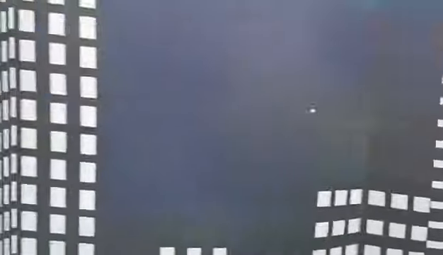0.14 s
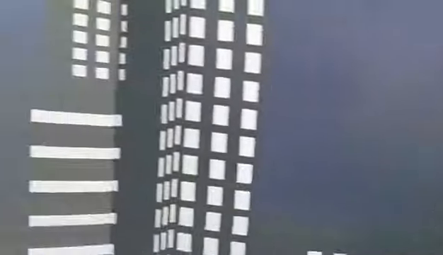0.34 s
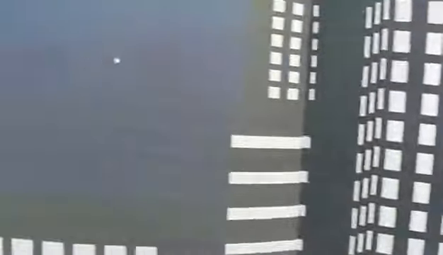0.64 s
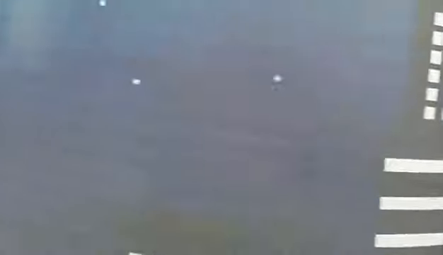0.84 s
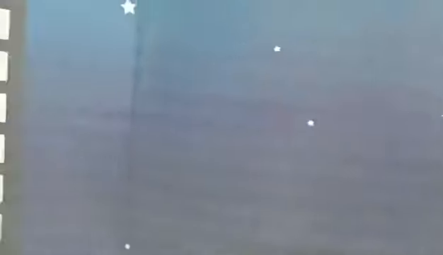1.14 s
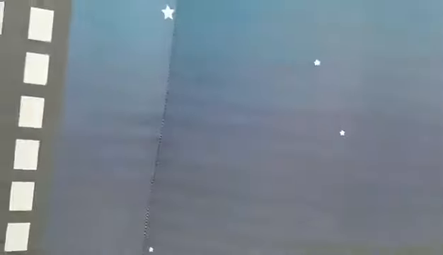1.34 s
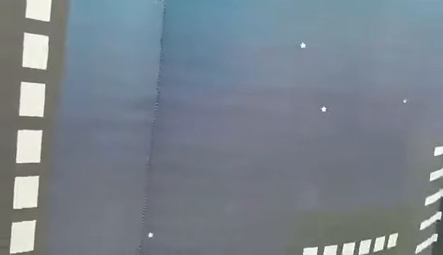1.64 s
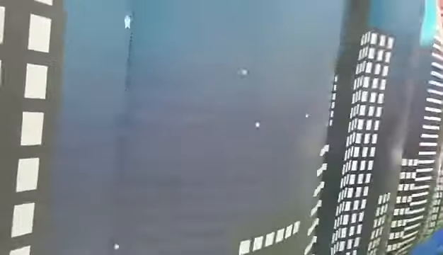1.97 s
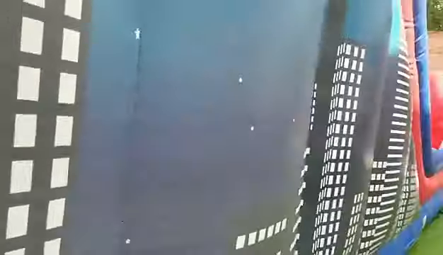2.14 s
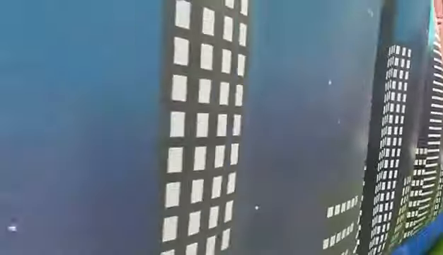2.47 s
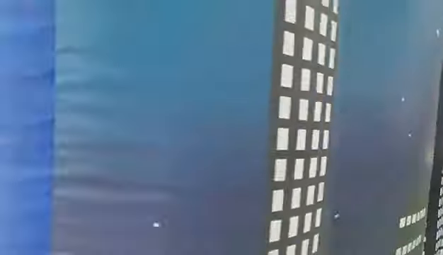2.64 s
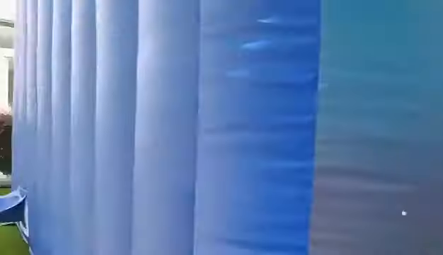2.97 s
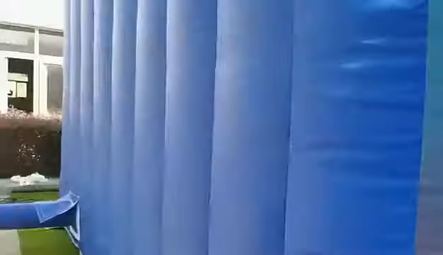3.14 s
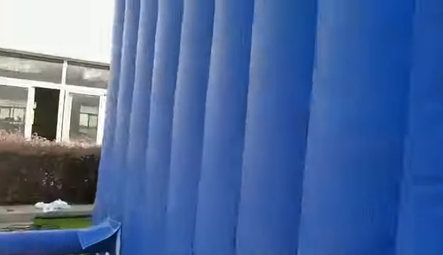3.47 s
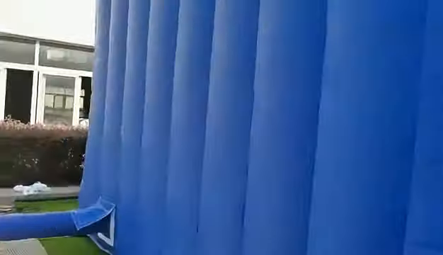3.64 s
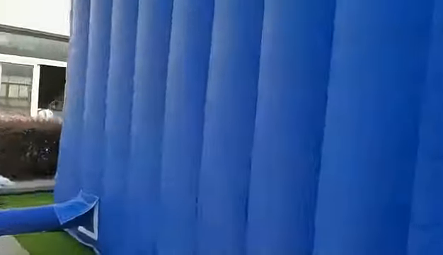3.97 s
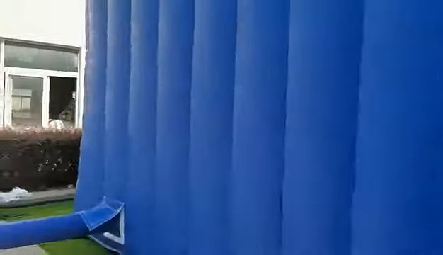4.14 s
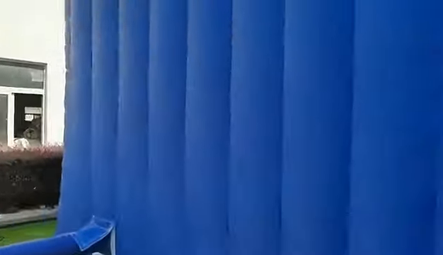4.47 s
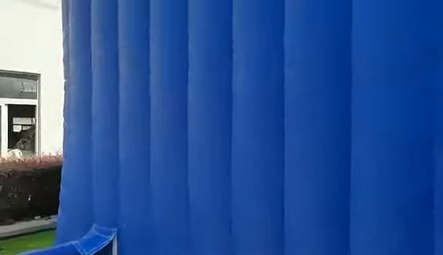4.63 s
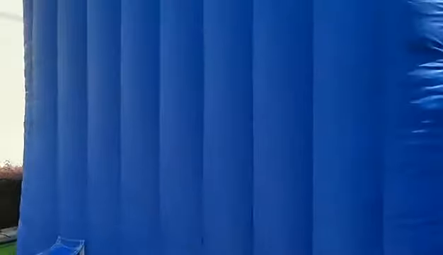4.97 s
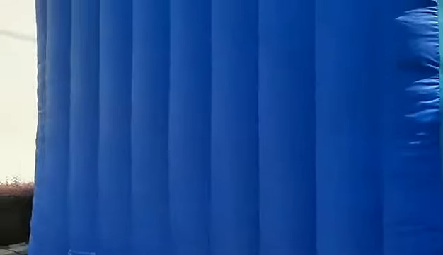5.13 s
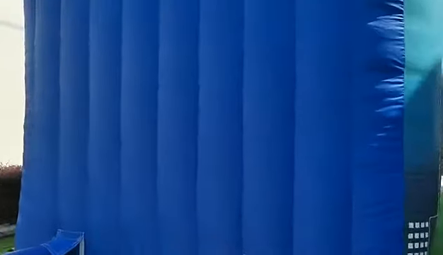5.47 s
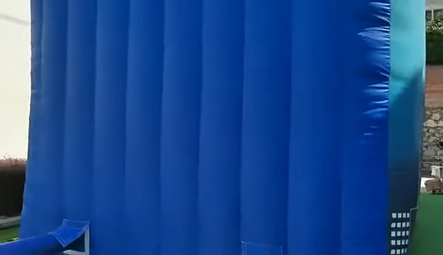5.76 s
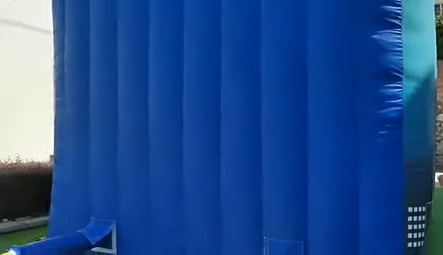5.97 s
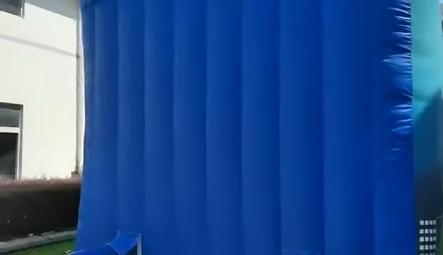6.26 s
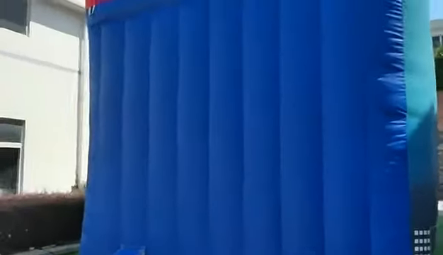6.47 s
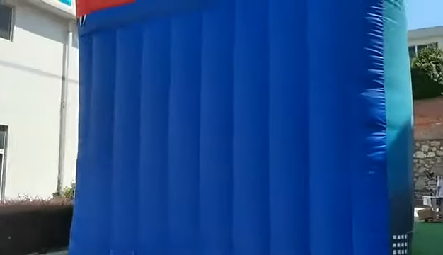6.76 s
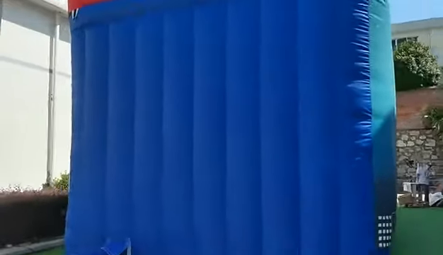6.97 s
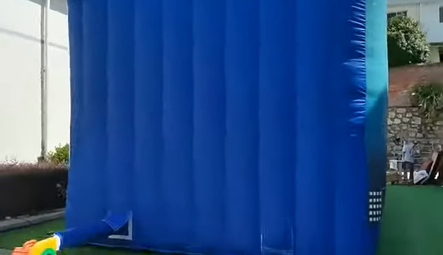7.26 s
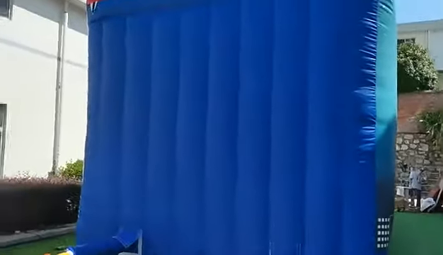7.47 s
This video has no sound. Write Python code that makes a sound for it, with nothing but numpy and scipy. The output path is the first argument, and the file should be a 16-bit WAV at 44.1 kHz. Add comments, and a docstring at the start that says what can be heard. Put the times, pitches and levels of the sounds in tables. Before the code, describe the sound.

Outdoors, a fan blower is first heard muffled behind the wall of a big inflatable. Within about three seconds the moving microphone comes into its path, and the sound grows louder and brighter, a steady airy rush with hiss on top. A faint wavering motor hum and a low rumble from the air-filled skin lie beneath. The noise continues to the end with a slightly swirling tone.

```python
"""An electric blower feeds a large inflatable outdoors: housing roar, intake rush, blade hiss, motor hum.
Two spaced microphones are carried round a corner. Behind the wall the sound is duller; in sight of the
blower the rush and hiss come up. Direct sound reaches the right microphone late; ground and wall echoes
comb it. Underneath, the skin booms, low air buffets and the feed tube adds a low-mid noise."""
import sys
import numpy as np
from scipy import signal
from scipy.fft import rfft, irfft
from scipy.io import wavfile
from scipy.ndimage import map_coordinates

SR = 44100
rng = np.random.default_rng(int(sys.argv[2]) if len(sys.argv) > 2 else 0)


def master(y):
    """Save y as 16-bit WAV."""
    cut = np.clip(np.atleast_2d(y).T, -1, 1)
    pcm = np.round(cut * 32767)  # scale
    wavfile.write(sys.argv[1], SR, pcm.astype(np.int16))


N = 335160
TIME_S = np.arange(N) / SR
HZ = np.fft.rfftfreq(N, 1 / SR) + 1e-3

# Fan noise bands. Each holds the walk settings listed at along_walk.
HOUSING_ROAR = (-31.5, 4.5, 1.24, 0.02, 1.06, -2.1, 1, 5.5, -21.5, -6.5, -1)
INTAKE_THROAT = (-28.5, 9.5, 1.84, 0.58, 1.05, 2, 2.5, 3.5, -17, -10.5, 0.5)
CASING_RUSH = (-35.5, 13.5, 2.06, 0.48, 1, 1.5, 6.5, -4, 11, 7.5, -9.5)
GRILLE_TURBULENCE = (-34, 11.5, 1.95, 0.2, 1.1943, 2, 5, 5.5, -15.5, -7.5, -5)
BLADE_HISS = (-33.5, 15.5, 1.56, 0.11, 0.05, 0.7, -0.2, 2, -8.5, -6.5, -1)
# Their swells and dips. Each row: peak in seconds, width in seconds, rise in dB, leftward push in dB.
HOUSING_SWELLS = [(1.8, 0.34, 1.4, 0.73), (2.8, 0.22, -0.19, 1.5), (4.9, 0.43, 1.5, 0),
                  (6.8, .25, 0.83, 0.32)]
THROAT_SWELLS = [(1.5, 0.2, -0.5, 0.5), (5.5, .4, 0.5, -0.5)]
CASING_SWELLS = [(2.0, 0.2, 6.5, -3.5), (4, .15, 0.5, 4.5), (7, .3, 2.5, 1.5)]
TURBULENCE_SWELLS = [(1.45, .2, 2.5, 4), (1.7, 0.16, 1, -4), (2.9, 0.317, -1.5, 1), (5.4, .3, -1.5, 1.5),
                     (6.9, 0.28, 1, -1.5)]
BLADE_SWELLS = [(2.15, 0.27, 2.5, 0), (2.86, 0.087, 2, -3.5), (3.6, 0.24, 2, -2.5), (4.65, 0.16, 2, 0),
                (5.6, 0.32, 2, 3.5), (6.3, 0.28, 2.5, -1.5), (7.1, 0.2, 1.5, -3)]

def blower():
    """Fan noise, direct in sight and scattered otherwise, echoed and split into five bands."""
    late_ms, direct, *ground_ms, _ = in_time(WALK_PATHS)
    source = rng.standard_normal(N)
    arrivals = np.array([source, delayed(source, late_ms)])
    pair = irfft(pair_spectrum(scatter(arrivals, direct)), N)
    spectrum = rfft(echoes(pair, ground_ms)) * minimum_phase(colours_db())
    roar = band(spectrum, HOUSING_ROAR, HOUSING_SWELLS, 806, 1737, eddy_depth=2.5, eddy_hz=10.8, slices=8)
    intake = band(spectrum, INTAKE_THROAT, THROAT_SWELLS, 1760, 2540,
                  eddy_depth=1.28, eddy_hz=6.8, slices=4)
    rush = band(spectrum, CASING_RUSH, CASING_SWELLS, 2610, 3575, eddy_depth=2.1, eddy_hz=16, slices=8)
    grille = band(spectrum, GRILLE_TURBULENCE, TURBULENCE_SWELLS, 3716, 5463,
                  eddy_depth=2.5, eddy_hz=27, slices=9)
    hiss = band(spectrum, BLADE_HISS, BLADE_SWELLS, 5484, 7710, eddy_depth=2.5, eddy_hz=23, slices=11)
    return roar + intake + rush + grille + hiss


# Mains hum and blade tones. Each row: pitch in Hz, level re housing roar in dB, waver in dB, blur in Hz.
MOTOR_TONES = [(300, -10, 5, 7), (400, -20, 4, 2), (1065, -18, 5, 3), (2115, -17, 4, 12)]

def motor():
    """Tones blur in pitch and waver as the microphones cross standing patterns."""
    roar_db = along_walk(HOUSING_ROAR)[0]
    late_s = in_time(WALK_PATHS)[0] / 1000
    heard_s = np.array([TIME_S, TIME_S - late_s])
    out = 0
    for hz, level_db, waver_db, blur_hz in MOTOR_TONES:
        cycles = hz * heard_s + np.cumsum(blur_hz * drift(7.76)[0]) / SR
        rms = from_db(roar_db + level_db + waver_db * drift(0.57))
        out += np.sqrt(2) * rms * np.sin(2 * np.pi * cycles)
    return out


# Low bands. Each holds the walk settings listed at along_walk.
AIR_RUMBLE = (-35, 2.5, 0.5, 0.5, 0.52, -1.2, 1.5, 5.5, 0.5, -1, -2)
SKIN_BOOM = (-29.5, 4, 2.5, 0.8, 1.17, 1.1, 3.5, -0.5, 4, 2.5, 2)
FEED_TUBE = (-38.5, 9, 2.5, 0.33, 0.27, -0.3, 2, -7, 24, 1.5, 1.5)
# Their swells. Each row: peak in seconds, width in seconds, rise in dB, leftward push in dB.
AIR_GUSTS = [(2.46, 0.28, 4, 8.5), (3.42, 0.36, 5.5, 3), (1.164, 0.21, 2, -0.5), (5.7, 0.23, 2, 1.5),
             (7.34, .3, 2.5, -0.5)]
SKIN_SWELLS = [(2.5, 0.224, 1, 0.5), (2.86, 0.087, 2.5, 0), (3.95, 0.19, 5, 0), (6.9, 0.133, 4, 1.5)]
FEED_SWELLS = [(2.1, 0.24, 4.4, -6), (7, 0.18, 1.6, 1)]

def inflatable():
    """Long waves of skin and air reach both microphones together; the tube is scattered until faced."""
    tube_noise = scatter(rng.standard_normal(N), direct=in_time(WALK_PATHS)[4])
    colour = from_db(colours_db())
    low_spectrum = pair_spectrum(rng.standard_normal(N)) * colour
    tube_spectrum = pair_spectrum(tube_noise) * colour
    rumble = band(low_spectrum, AIR_RUMBLE, AIR_GUSTS, 18, 152.2, eddy_depth=2.5, eddy_hz=3, slices=7)
    boom = band(low_spectrum, SKIN_BOOM, SKIN_SWELLS, 154.6, 385.4,
                eddy_depth=2.5, eddy_hz=3.4, slices=12)
    tube = band(tube_spectrum, FEED_TUBE, FEED_SWELLS, 377, 811, eddy_depth=4, eddy_hz=3, slices=11)
    return rumble + boom + tube


def band(spectrum, settings, swells, low_hz, high_hz, eddy_depth, eddy_hz, slices):
    """One noise band in narrow slices; each swells as eddies pass, partly alike on both sides."""
    edges_hz = np.geomspace(low_hz, high_hz, slices + 1)
    out = 0
    for low, high in zip(edges_hz, edges_hz[1:]):
        power = np.clip(1 / (1 + (low / HZ) ** 80) - 1 / (1 + (high / HZ) ** 80), 0, 1)
        eddies = drift(eddy_hz)
        gain = from_db(eddy_depth * (eddies[0] + 0.61 * eddies[::-1]))
        out += irfft(spectrum * np.sqrt(power), N) * gain
    swell_db = sum(np.outer([rise_db, left_db], bump(peak_s, width_s))
                   for peak_s, width_s, rise_db, left_db in swells)
    level_db, pan_db = along_walk(settings) + swell_db
    return rms_one(out) * from_db([level_db + pan_db / 2, level_db - pan_db / 2])


# Sound paths on the walk. Each row: time in seconds, right microphone lag in ms, blower direct share,
# left and right ground echo delays in ms, tube direct share.
WALK_PATHS = [(0, 0.12, .7, 2.0, 2.0, .7), (.9, 0.107, 0.55, 1.9, 1.9, 0.8), (1.2, 0.37, 0, 1.9, 1.2, .5),
              (1.5, 0.42, 0.7, 1.5, .5, .35), (2, 0.49, 1, 1.4, 0.49, .35),
              (2.6, 0.39, 0.91, 1.5, 0.65, .4), (3.2, 0.36, 0.96, 1.55, .95, 0.5),
              (4, 0.331, 0.98, 1.59, 0.92, .55), (4.6, 0.32, .97, 1.7, 1.1, 0.7),
              (5, 0.3, 0.98, 1.75, 1.38, 0.8), (5.7, 0.31, 0.99, 1.75, 1.42, .9),
              (6.2, 0.24, 0.99, 1.69, 1.46, 0.94), (7.6, 0.24, 0.94, 1.6, 1.4, .95)]
# Nearness to the blower. Each row: time in seconds, level in dB before a band's nearness factor.
WALK_NEARNESS = [(0, 0.5), (.5, 0), (1, -1), (1.6, -2.5), (2.2, -1), (2.8, 1), (3.4, 0), (4, 0), (4.6, 0),
                 (5.2, -1.5), (5.8, -2), (6.4, -2.5), (7, -3.5), (7.6, -5.5)]

# Walk settings of a band: level in sight in dB, wall loss in dB, corner time and ramp in seconds,
# nearness factor, intake axis gain in dB, swing gain in dB, pan (left minus right) in dB,
# pan change in dB per ms of lag, in dB behind the wall and in dB after the swing.
def along_walk(settings):
    """Level and pan in dB from wall shadow, nearness, intake axis and bearing."""
    (sight_db, wall_db, corner_s, ramp_s, nearness_factor, axis_db, swing_db,
     pan_db, pan_db_per_ms, wall_pan_db, swing_pan_db) = settings
    left_hidden = 1 - step(corner_s - 0.062, ramp_s)  # left clears the corner first
    right_hidden = 1 - step(corner_s, ramp_s)
    hidden = (left_hidden + right_hidden) / 2
    on_axis = bump(at_s=5.07, width_s=0.47)
    swung = step(at_s=7.36, width_s=0.055)  # the microphones swing round
    level_db = (sight_db - wall_db * hidden + nearness_factor * in_time(WALK_NEARNESS)[0]
                + axis_db * on_axis + swing_db * swung)
    balance_db = (pan_db + pan_db_per_ms * in_time(WALK_PATHS)[0] + wall_pan_db * hidden
                  + swing_pan_db * swung + wall_db * (right_hidden - left_hidden))
    return np.array([level_db, balance_db])


# Wall reflections. Each row: first delay in ms, last delay in ms, level in dB.
WALL_REFLECTIONS = [(2.912, 2.7, -13.5), (4.67, 3.6, -14.5), (7.495, 9.5, -11.5), (12.53, 10.5, -9),
                    (13.97, 16.5, -12), (20.98, 18, -11), (27.1, 31, -11)]

def echoes(pair, ground_ms, ground_db=-11.5, sway_share=0.03, side_ms=0.05):
    """Ground and wall echoes comb the noise; their paths sway at random, a little unlike per side."""
    paths = [(np.array(ground_ms), ground_db)]
    paths += [(np.linspace(first_ms, last_ms, N), db) for first_ms, last_ms, db in WALL_REFLECTIONS]
    out = pair.copy()
    for late_ms, level_db in paths:
        swayed_ms = late_ms * (1 + sway_share * drift(0.609)[0]) + side_ms * drift(0.43)
        out += from_db(level_db) * np.array([delayed(side, ms) for side, ms in zip(pair, swayed_ms)])
    return out


# Spectral ridges and hollows. Each row: start and end in seconds, first and last centre in Hz,
# width in Hz, left and right gain in dB.
GLIDING_RIDGES = [(2, 4.8, 1880, 1850, 110, 2, 3), (3.5, 6.3, 2070, 2230, 87, 1.5, 4),
                  (1.83, 2.6, 2580, 2330, 120, 7, 4), (2, 5.1, 2600, 3200, 110, 3.5, -0.5),
                  (1, 5.5, 2640, 2660, 80, -2, 1), (2, 3.1, 1600, 1100, 110, -1.5, -2),
                  (0.5, 7.6, 1100, 1200, 90, -1, -2), (6, 9.1, 1000, 750, 90, -4, 0.5),
                  (1.5, 3.6, 790, 1300, 95, 1, 2.5), (3.5, 5.9, 1600, 1200, 90, 5, 2),
                  (7, 7.35, 2100, 1700, 150, -5.5, -5.5), (6, 7.3, 3250, 3500, 89, -2, -2.5),
                  (-1.5, 1.4, 4100, 3300, 180, -4, -0.5), (0, 0.61, 780, 730, 190, 7, 2.5),
                  (2, 2.6, 870, 660, 120, -0.5, -3), (4, 7.6, 640, 510, 130, 2.5, 1.5),
                  (2, 2.3, 4800, 4800, 110, -0.5, 10.5), (0.5, 4.2, 4400, 3700, 140, 2.5, 2.5),
                  (1.5, 3.4, 3500, 3900, 120, -0.5, 3), (6.5, 7.9, 4700, 5300, 380, 1.5, -4.5),
                  (2.5, 3.6, 7300, 5300, 630, -2.5, 1), (4.5, 5.2, 6000, 5900, 350, 2, -1),
                  (-0.5, 0.98, 5700, 5200, 300, -2.5, 2.5), (1.78, 2.5, 7200, 7100, 300, 4.5, -2),
                  (5.8, 9.1, 2500, 2450, 110, 0.5, 3), (4.5, 5.7, 330, 320, 53, -2.5, -2),
                  (3.5, 4.6, 280, 250, 40, 3, 1), (3.5, 4.7, 190, 180, 22, -3, -2),
                  (5, 6.16, 200, 200, 30, 2, 2.5), (2.3, 3.1, 450, 370, 65, 2, 6),
                  (6.5, 7.5, 2250, 2220, 82, 3, 4), (1.5, 3.6, 890, 1100, 70, 1.5, 1.5),
                  (1.4, 2.2, 3800, 3850, 200, 5, -1), (1.45, 2.0, 4500, 4500, 150, 4, 4),
                  (4.7, 5.8, 1620, 1620, 80, 3, 4), (0.9, 2.0, 820, 820, 90, 0, -5),
                  (1.3, 2.4, 1350, 1300, 150, -3, -1), (0, 1.0, 1700, 1700, 100, 1, 4),
                  (5.8, 6.6, 4100, 4200, 180, 0, 4), (6.9, 7.6, 5000, 5000, 150, 0, 4),
                  (2.0, 2.9, 4750, 4750, 120, -1, -4)]
# Patches of shifted stereo width and phase. Each row: start and end in seconds, first and last centre
# in Hz, width in Hz, delayed share on the right, left phase turn in radians.
STEREO_PATCHES = [(0, 1.3, 1760, 2400, 700, .92, 0.01), (1.5, .9, 3450, 3450, 150, .01, .5),
                  (0.6, 2.6, 2700, 2900, 150, .01, .6), (1.5, 3.2, 2100, 2300, 240, .6, 0.2),
                  (3.5, 5.2, 1850, 1900, 150, 0, -1), (2.5, 7.6, 1040, 1150, 150, .8, .9),
                  (6, 7.6, 2600, 2660, 250, .2, -1.6), (5.5, 7.4, 2300, 2210, 100, .85, 0.3),
                  (3, 4.5, 2500, 2500, 150, .65, 0.4), (1.5, 2.5, 620, 670, 82, .5, 1.5),
                  (3.5, 6.2, 3900, 3700, 170, .6, .8), (3.5, 3.6, 2900, 3100, 200, .65, 0.5),
                  (2.7, 3, 2900, 3100, 110, .6, -0.3), (2.7, 3.9, 880, 820, 87, 0.08, -1.1),
                  (3.2, 7.6, 1400, 1450, 150, .3, .7), (1.5, 2.6, 3650, 3650, 250, .01, -1.0),
                  (6.1, 7.6, 3000, 3000, 200, .6, .01), (6.2, 7.6, 1750, 1800, 250, .4, .4)]

def gliding_patches(pair, fade_s=0.12, late_frames=3):
    """Ridges and hollows glide through the noise; its stereo width and left-right phase shift in patches."""
    hz, frame_s, (left, right) = signal.stft(pair, SR, nperseg=2048)

    def patches(rows):
        out = 0
        for start_s, end_s, first_hz, last_hz, width_hz, *values in rows:
            gate = (np.tanh((frame_s - start_s) / fade_s) - np.tanh((frame_s - end_s) / fade_s)) / 2
            centre_hz = np.interp(frame_s, [start_s, end_s], [first_hz, last_hz])
            bell = np.exp(-.5 * ((hz[:, None] - centre_hz) / width_hz) ** 2)
            out += np.multiply.outer(values, gate * bell)
        return out

    share, turn_rad = patches(STEREO_PATCHES)
    share = np.clip(share, 0, 1)
    late = right[:, abs(np.arange(len(frame_s)) - late_frames)]
    frames = np.array([left * np.exp(1j * turn_rad), np.sqrt(1 - share) * right + np.sqrt(share) * late])
    return signal.istft(frames * from_db(patches(GLIDING_RIDGES)), SR, nperseg=2048)[1][:, :N]


# Noise colour per microphone. Each row: frequency in Hz, relative density in dB.
LEFT_SPECTRUM = [(30, -14.5), (60, 2.5), (120, 1), (250, -0.2), (330, -6.5), (520, -14), (900, -12.5),
                 (1350, -10), (1750, -11), (2100, -11.5), (2600, -10), (3200, -15.5), (4100, -12.5),
                 (4900, -18.5), (5800, -11.5), (6700, -5.5), (7400, -8)]
RIGHT_SPECTRUM = [(30, -14.5), (60, -15), (120, -3.5), (250, 1.5), (330, -3), (520, -13.5), (900, -8),
                  (1500, -5.5), (1800, -4), (2100, -0.5), (2400, -5), (2700, -10), (3200, -16), (4100, -9),
                  (4900, -15.5), (5800, -10.5), (6700, -6), (7400, -7.5)]

def colours_db():
    return np.array([at_hz(LEFT_SPECTRUM), at_hz(RIGHT_SPECTRUM)])


# Likeness of the two microphones. Each row: frequency in Hz, shared power from 0 to 1.
PAIR_LIKENESS = [(40, 0.5), (120, 0.83), (300, 1), (600, 1), (1000, 0.75), (1500, 0.85), (1800, 0.97),
                 (2700, 0.95), (3100, 0.95), (3700, 0.95), (4100, .4), (4600, 0.2), (7000, 0.26)]

def pair_spectrum(shared):
    """Left and right spectra of shared plus diffuse noise."""
    alike = np.clip(at_hz(PAIR_LIKENESS), 0, 1)
    return np.sqrt(alike) * rfft(shared) + np.sqrt(1 - alike) * rfft(rng.standard_normal((2, N)))


def scatter(x, direct):
    """Keeps the direct share of the power; the rest arrives as diffuse noise."""
    direct = np.clip(direct, 0, 1)
    return np.sqrt(direct) * x + np.sqrt(1 - direct) * rng.standard_normal((2, N))


def minimum_phase(colour_db):
    """Causal response of a colour: a port resonance also turns the phase."""
    cepstrum = irfft(colour_db * np.log(10) / 20, N)
    cepstrum[..., 1:N // 2] *= 2
    cepstrum[..., N // 2 + 1:] = 0
    return np.exp(rfft(cepstrum))


def drift(rate_hz, hop=40):
    """Slow random motion per microphone, RMS 1."""
    pole = np.exp(-2 * np.pi * rate_hz * hop / SR)
    noise = rng.standard_normal((2, N // hop + 2002))
    slow = rms_one(signal.lfilter([1], [1, -2 * pole, pole * pole], noise)[:, 2000:])
    return np.array([np.interp(np.arange(N) / hop, np.arange(len(side)), side) for side in slow])


def delayed(x, late_ms):
    return map_coordinates(x, [np.arange(N) - late_ms * SR / 1000], order=3, mode="mirror")


def step(at_s, width_s):
    return .5 + .5 * np.tanh((TIME_S - at_s) / width_s / 2)


def bump(at_s, width_s):
    return np.exp(-.5 * ((TIME_S - at_s) / width_s) ** 2)


def in_time(rows):
    times_s, *columns = np.transpose(rows)
    return [np.interp(TIME_S, times_s, column) for column in columns]


def at_hz(rows):
    hz, values = np.transpose(rows)
    return np.interp(np.log(HZ), np.log(hz), values)


def from_db(db):
    return 10 ** (np.asarray(db) / 20)


def rms_one(x):
    return x / np.sqrt(np.mean(x ** 2, axis=-1, keepdims=True) + 1e-20)


def scene():
    """Air noise with gliding patches, plus motor tones."""
    return gliding_patches(inflatable() + blower()) + motor()


def record(dry):
    """Steep treble cut."""
    cutoff_hz = 7490
    return signal.sosfilt(signal.ellip(14, .3, 80, cutoff_hz, fs=SR, output="sos"), dry)


dry = scene()
out = record(dry)
master(out)
```